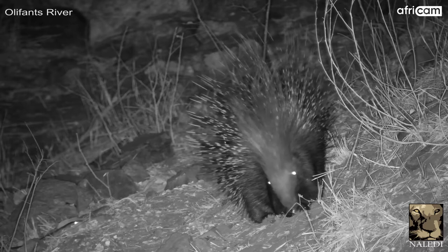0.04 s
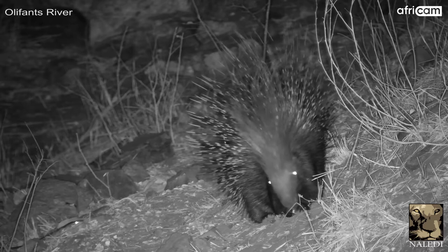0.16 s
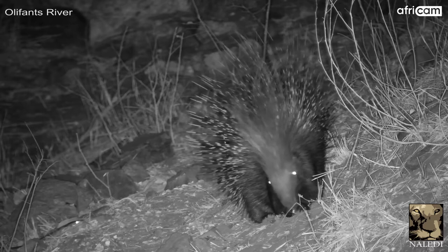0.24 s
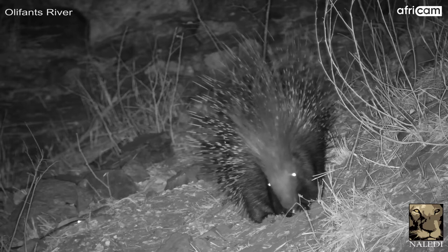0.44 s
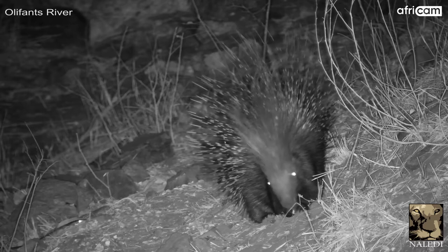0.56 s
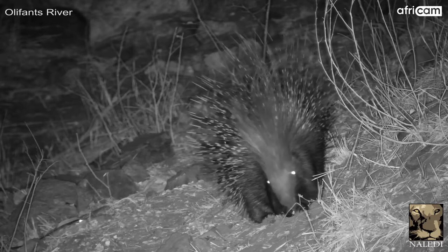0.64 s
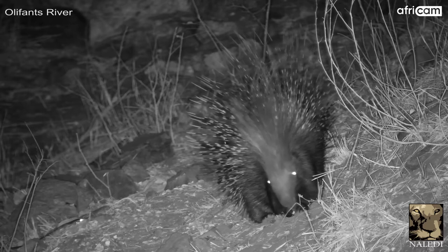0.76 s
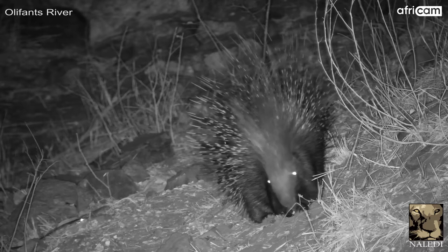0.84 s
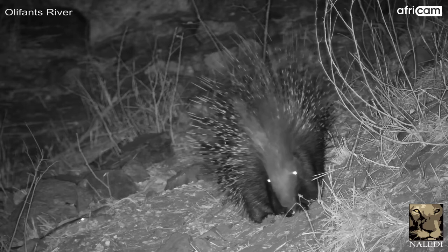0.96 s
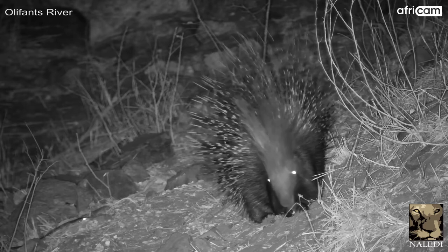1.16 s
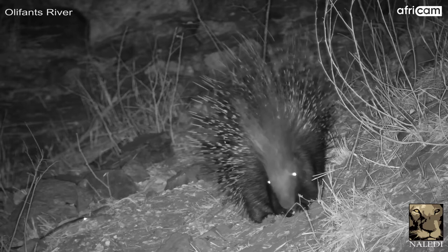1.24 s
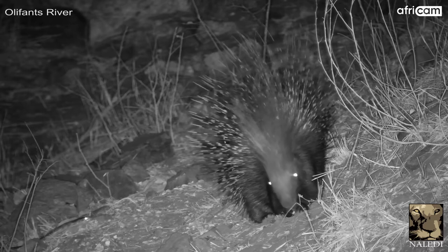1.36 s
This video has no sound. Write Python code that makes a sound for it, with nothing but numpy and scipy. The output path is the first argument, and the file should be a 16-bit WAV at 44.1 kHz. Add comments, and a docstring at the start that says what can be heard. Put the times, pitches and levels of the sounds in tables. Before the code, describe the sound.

A night chorus of frogs and insects, heard from a fixed outdoor microphone. Distant frogs pulse, lull and return under rapid chirps and cricket rasps. Early on, one loud, close whoop bends upward. Faint hiss and hum lie underneath.

```python
"""Frogs in the bush at night

From a fixed outdoor microphone: a distant frog chorus pulses low and high, lulls and returns.
Close by, one loud whoop bends upward, probably a frog. Insects trade short falling chirps at two
pitches over the wing rasp of crickets. Underneath lie faint hiss and the line's mains hum and buzz."""
import sys
import numpy as np
from scipy import signal
from scipy.fft import rfft, irfft
from scipy.io import wavfile
from scipy.ndimage import uniform_filter1d

SR = 44100
rng = np.random.default_rng(int(sys.argv[2]) if len(sys.argv) > 2 else 0)


def generate_wav(signal):
    """Clip the signal to [-1, 1] and save it as 16-bit WAV at the path in sys.argv[1]."""
    frames = np.transpose(np.atleast_2d(signal))
    scaled = np.clip(frames, -1, 1) * 32767
    pcm = np.round(scaled).astype(np.int16)
    wavfile.write(sys.argv[1], SR, pcm)


N = 61739


def undb(db):
    """Decibels to gain."""
    return 10 ** (np.asarray(db) / 20)


def unit(x):
    """Scale to an rms of one."""
    return x / np.sqrt(np.mean(x ** 2) + 1e-20)


def colour(x, points):
    """Shape a spectrum through (Hz, dB) points, at an rms of one."""
    hz, db = np.array(points, float).T
    bins_hz = np.maximum(np.fft.rfftfreq(N, 1 / SR), 1)
    gain = undb(np.interp(np.log(bins_hz), np.log(hz), db))
    return unit(irfft(rfft(x) * gain, N))


def resonate(x, hz, width_hz):
    """A steep resonance: one band-pass applied twice, at an rms of one."""
    b, a = signal.iirpeak(hz, hz / width_hz, fs=SR)
    return unit(signal.lfilter(b, a, signal.lfilter(b, a, x)))


def walk(rate_hz):
    """A smooth random drift with a spread of one."""
    hold = max(int(SR / rate_hz), 1)
    steps = np.repeat(rng.standard_normal(N // hold + 1), hold)
    return unit(uniform_filter1d(steps, hold)[:N])


def pulses(rate_hz, jitter, scatter_db, count=400):
    """A train of clicks, uneven in spacing and strength."""
    spacing, strength = rng.standard_normal((count, 2)).T
    periods = np.cumsum(np.exp(jitter * spacing)) - rng.random() - .5
    at = (periods / rate_hz * SR).astype(int)
    inside = (at >= 0) & (at < N)
    return np.bincount(at[inside], undb(scatter_db * strength[inside]), N)


def burst(u, length_s, edge):
    """A round-topped envelope centred on u = 0; a small edge gives steep ends."""
    return np.maximum(np.cos(np.pi * np.clip(u / length_s, -.5, .5)), 0) ** edge


# The course of the distant chorus, register by register:
# (time [s], low croak level [dB], high rattle level [dB], top level [dB], lead frog's pitch [Hz])
CHORUS_COURSE = [(0, -30.5, -38.5, -34, 1810), (.06, -29.5, -28, -38.5, 1770),
                 (0.119, -32.5, -42, -39, 1770), (0.258, -29, -34, -39.5, 1690), (.52, -32, -33, -49, 1765),
                 (.585, -33, -27.5, -39, 1785), (.64, -32.5, -35, -40, 1765),
                 (.72, -38.5, -30.5, -49, 1773), (.762, -38, -33.5, -53, 1775),
                 (0.784, -44, -47, -73, 1700), (.89, -49.5, -53, -75, 1700),
                 (0.989, -39.5, -45.5, -62, 1690), (1.111, -33.5, -36, -40.5, 1650),
                 (1.232, -30.5, -32, -36, 1770), (1.32, -31, -31, -34, 1790),
                 (1.4, -33.5, -28.5, -34.5, 1765)]
# Frog voices: (register [1 low, 2 high, 3 top], resonance [Hz], width [Hz], pulse rate [Hz], trim [dB])
FROG_VOICES = [(1, 803, 195, 95, -3), (1, 946, 300, 95, -7), (1, 1244, 565, 110, -8.5),
               (2, 1640, 180, 85, -5.5), (3, 1880, 230, 120, -0.5), (3, 2120, 210, 120, -7)]


def frog_chorus(t, frogs_per_voice=4):
    """Far off in the bush, frogs send pulse trains through their throat resonances."""
    course, out = np.array(CHORUS_COURSE), np.zeros(N)
    for register, hz, width_hz, rate_hz, trim_db in FROG_VOICES:
        trains = sum(pulses(rate_hz, jitter=.2, scatter_db=2.5) for _ in range(frogs_per_voice))
        level_db = np.interp(t, course[:, 0], course[:, round(register)])
        out += undb(level_db + trim_db) * resonate(trains, hz, width_hz)
    return out


def lead_frog(t, pulse_hz=74.54, ring_s=.0075, trim_db=-1):
    """The nearest frog of the high register holds one gliding pitch that throbs with its pulses."""
    at, _, high_db, _, hz = np.array(CHORUS_COURSE).T
    b, a = signal.butter(2, 1 / (np.pi * ring_s), fs=SR)
    throb = signal.lfilter(b, a, pulses(pulse_hz, jitter=.2, scatter_db=2.5))
    waver = .55 * walk(55)
    phase = 2 * np.pi * np.cumsum(np.interp(t, at, hz)) / SR + waver
    return undb(np.interp(t, at, high_db) + trim_db) * unit(throb * np.sin(phase))


# One close whoop between two faint ones:
# (peak time [s], starting pitch [Hz], level [dB], swell [s], upward bend [share of pitch])
WHOOPS = [(.2160, 485, -22, .0035, .0), (.2410, 468, -3.9, .0122, .67), (.311, 535, -27, .011, .06)]


def whoops(t, bend_at_s=.0032, bend_s=.0052, fade_share=.72):
    """Hollow notes swell and are cut short, each with a husky puff; the loud one bends well upward."""
    out = np.zeros(N)
    lowpass = signal.butter(2, 350, fs=SR, output="sos")
    puff = undb(-44) * unit(signal.sosfilt(lowpass, rng.standard_normal(N)))
    husk = undb(-26) * resonate(rng.standard_normal(N), hz=427, width_hz=153)
    for at, hz, db, swell_s, rise in WHOOPS:
        u = t - at
        bend = .5 + .5 * np.tanh((u - bend_at_s) / bend_s / 2)
        pitch = hz * (1 + rise * bend)
        tone = np.sqrt(2) * np.sin(2 * np.pi * np.cumsum(pitch) / SR)
        slope_s = swell_s * np.where(u < 0, 1, fade_share)
        envelope = np.exp(-np.abs(u / slope_s) ** 1.6)
        out += undb(db) * envelope * (tone + puff + husk)
    flutter = 1 + .02 * walk(320)
    return out * flutter


# Chirps of the lower insect: (centre time [s], pitch [Hz], level [dB])
LOW_CHIRPS = [(0.014, 3703, -28.5), (.078, 3660, -29), (.143, 3698, -27.5), (0.209, 3670, -28),
              (0.277, 3690, -29.5), (.626, 3528, -47.5), (0.674, 3500, -43.5), (0.707, 3790, -45),
              (.732, 3490, -45), (0.787, 3540, -44.5), (0.846, 3634, -41), (0.871, 3610, -37),
              (.913, 3600, -36), (0.964, 3620, -33.5), (1.013, 3600, -36), (1.066, 3700, -35),
              (1.124, 3680, -36), (1.181, 3660, -36.5), (1.238, 3690, -38.5), (1.307, 3660, -38),
              (1.366, 3730, -37)]
# Chirps of the higher insects: (centre time [s], pitch [Hz], level [dB])
HIGH_CHIRPS = [(0.024, 4780, -34), (.068, 4570, -34), (.110, 4530, -35), (.155, 4630, -30.5),
               (0.186, 4840, -35.5), (0.205, 4700, -30), (.230, 4810, -31.5), (.253, 4750, -32.5),
               (.278, 4820, -37), (.297, 4804, -31), (0.319, 4564, -29.5), (0.359, 4620, -28.5),
               (0.403, 4530, -30), (.446, 4580, -28), (.498, 4714, -33), (.580, 4824, -40.5),
               (0.607, 4740, -35), (0.628, 4340, -45), (0.658, 4590, -34.5), (.702, 4693, -30.5),
               (.745, 4680, -35), (0.766, 4680, -36), (0.806, 4750, -30.5), (.846, 4780, -32.5),
               (.887, 4810, -38.5), (.959, 4665, -35), (1.003, 4613, -35.5), (1.037, 4698, -28),
               (1.078, 4740, -35), (1.126, 4716, -32), (1.172, 4740, -31.5), (1.225, 4574, -33.5),
               (1.264, 4580, -32.5), (1.308, 4540, -38.5), (1.35, 4610, -36)]


def insect_chirps(t, table, fall_hz_per_s, steepen, sag_hz_per_s2):
    """Near-pure whistles slide down a slight curve; how fast they fall depends on their pitch."""
    out, usual_hz = np.zeros(N), np.median(np.array(table)[:, 1])
    flutter, wobble = 1 + .14 * walk(600), .25 * walk(400)
    for at, hz, db in table:
        u = t - at
        fall = fall_hz_per_s * (hz / usual_hz) ** steepen
        pitch = hz - fall * u - sag_hz_per_s2 * u ** 2
        phase = 2 * np.pi * (np.cumsum(pitch) / SR + rng.random())
        out += undb(db) * np.sqrt(3) * burst(u, length_s=.028, edge=.88) * np.sin(phase + wobble)
    return out * flutter


# Rasps of the nearer crickets: (centre time [s], level [dB])
RASPS = [(0.152, -35.5), (0.196, -46), (.24, -39), (.295, -38.5), (.41, -41), (0.45, -39), (.533, -47),
         (0.625, -42), (.662, -36.5), (0.757, -35.5), (0.99, -35.5), (1.033, -37), (1.081, -37),
         (1.12, -41), (1.169, -40), (1.306, -39.5), (1.361, -43.5)]


def crickets(t, pulse_hz=199.4, count=3):
    """Quick wing pulses make short rasps around a thin ring; far crickets ring on between them."""
    def wings():
        return sum(pulses(pulse_hz, jitter=.25, scatter_db=2) for _ in range(count))

    effort = sum(undb(db) * burst(t - at, length_s=.033, edge=.17) for at, db in RASPS)
    strokes = wings()
    rasp = effort * undb(1.5) * resonate(strokes, hz=4670, width_hz=1200)
    rasp_band = signal.butter(4, (4534, 5215), "bandpass", fs=SR, output="sos")
    upper = effort * undb(-18.5) * resonate(strokes, hz=5980, width_hz=380)
    near_gain, far_gain = effort * undb(-1.5), undb(-48.5)
    ring = (near_gain + far_gain) * resonate(wings(), hz=4692, width_hz=133)
    return signal.sosfilt(rasp_band, rasp) + upper + ring


# Hum on the microphone line, harmonics 3, 5, 7 and so on: (level [dB])
HUM_LEVELS = [-66.5, -55, -53, -51.5, -51.5, -55.5, -59, -54.5]
# Spectrum of the line's buzz: (frequency [Hz], relative level [dB])
BUZZ_SPECTRUM = [(5000, -43), (7000, -20), (9000, -4), (10000, 1.5), (11400, 7.5), (12000, 3.5),
                 (12600, -44)]


def mains(t, mains_hz=49.94, first_tick_s=.0064, fizz_s=.0016):
    """Mains in the microphone line: odd harmonics hum, and a thin, fizzy tick marks each half cycle."""
    hum = np.zeros(N)
    for k, db in enumerate(HUM_LEVELS):
        hz = (2 * k + 3) * mains_hz
        hum += undb(db) * np.sqrt(2) * np.sin(2 * np.pi * (hz * t + rng.random()))
    tick_hz = 2 * mains_hz
    from_tick_s = (((t - first_tick_s) * tick_hz + .5) % 1 - .5) / tick_hz
    ticks = unit(np.sinc(from_tick_s * SR / np.sqrt(2)))
    fizz = unit(rng.standard_normal(N) * np.exp(-np.abs(from_tick_s) / fizz_s))
    buzz = colour(ticks + .55 * fizz, BUZZ_SPECTRUM)
    flicker_db = 1.6 * walk(100)
    return hum + undb(-49.5 + flicker_db) * buzz


# Spectrum of the background hiss: (frequency [Hz], relative level [dB])
HISS_SPECTRUM = [(55, -1.5), (110, -3.5), (400, 10.5), (650, 16), (1200, 7.5), (2300, 11), (2750, -1.5),
                 (3750, 7), (5400, 0.5), (6100, -4), (6800, -5), (12500, -5.5)]


def hiss():
    """A faint, steady noise floor behind the animals."""
    return undb(-41.5) * colour(rng.standard_normal(N), HISS_SPECTRUM)


def scene():
    """Frogs and insects over mains noise and hiss, in mono from one spot in the bush."""
    t = np.arange(N) / SR
    low = insect_chirps(t, LOW_CHIRPS, fall_hz_per_s=16000, steepen=6.3, sag_hz_per_s2=-250000)
    high = insect_chirps(t, HIGH_CHIRPS, fall_hz_per_s=16500, steepen=-4, sag_hz_per_s2=400000)
    insects = low + high + crickets(t)
    noise_floor = hiss()
    frogs = frog_chorus(t) + lead_frog(t) + whoops(t)
    return (frogs + insects + mains(t) + noise_floor)[None]


def record(dry):
    """The recorder cuts the treble steeply above 12.2 kHz."""
    return signal.sosfiltfilt(signal.ellip(8, .1, 50, 12200, fs=SR, output="sos"), dry)


dry = scene()
out = record(dry)
generate_wav(out)
```